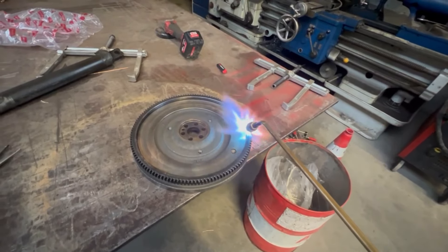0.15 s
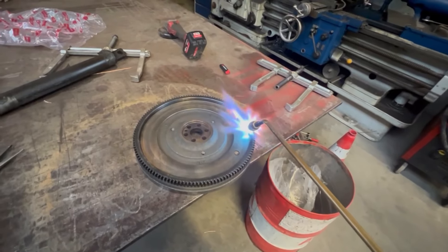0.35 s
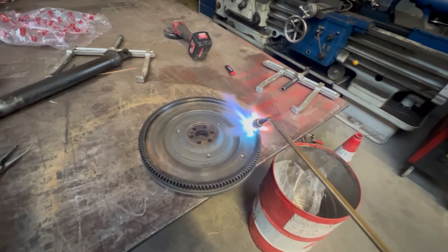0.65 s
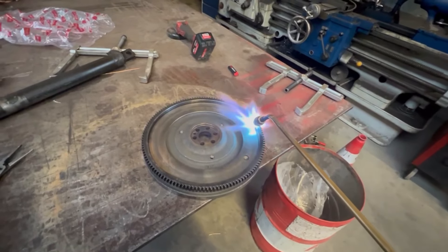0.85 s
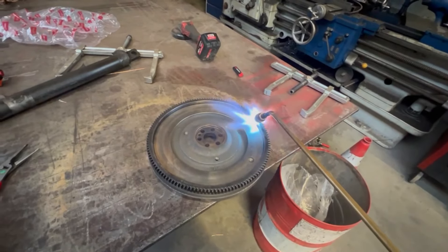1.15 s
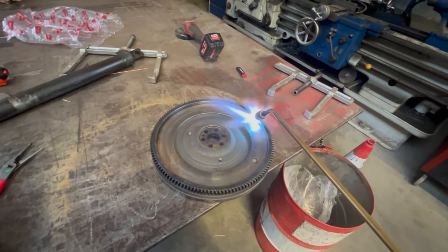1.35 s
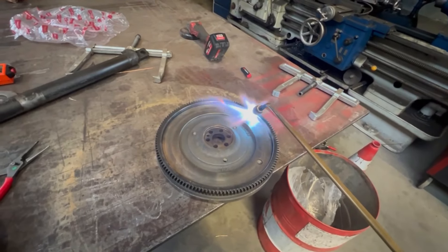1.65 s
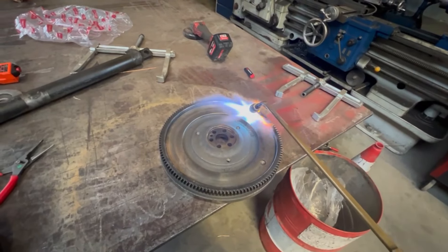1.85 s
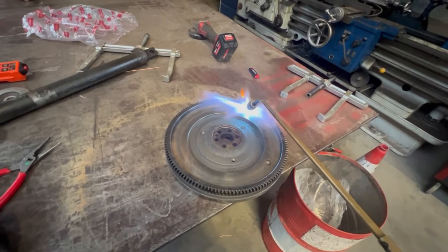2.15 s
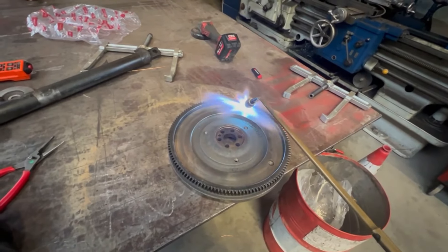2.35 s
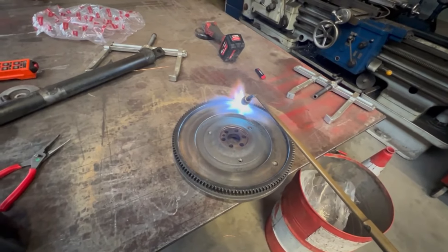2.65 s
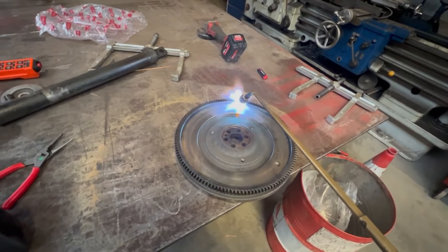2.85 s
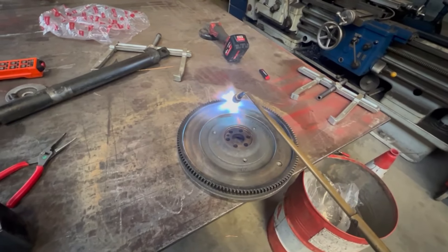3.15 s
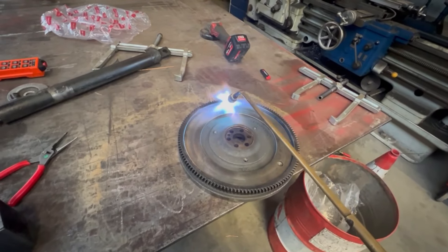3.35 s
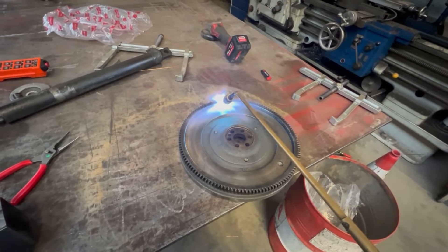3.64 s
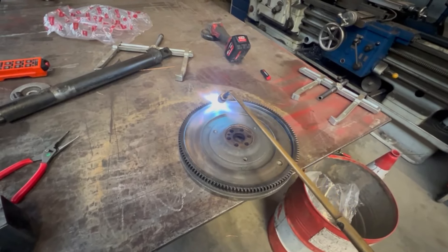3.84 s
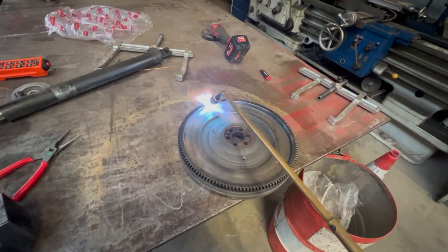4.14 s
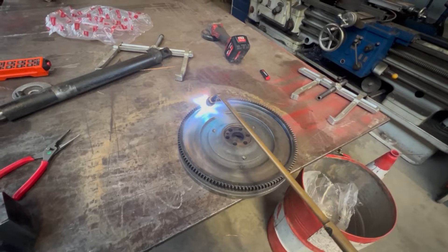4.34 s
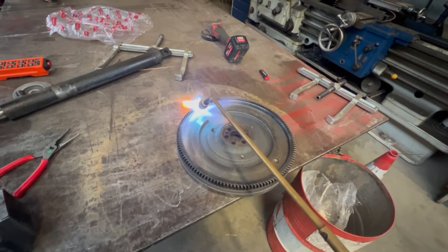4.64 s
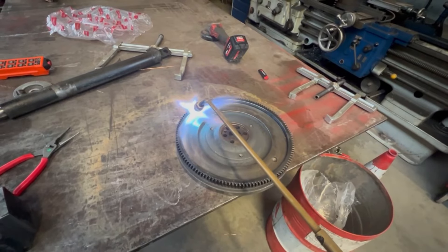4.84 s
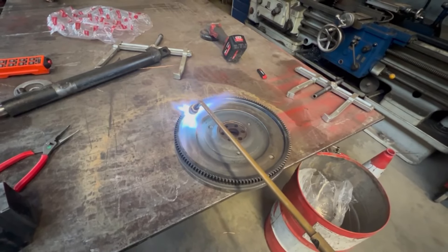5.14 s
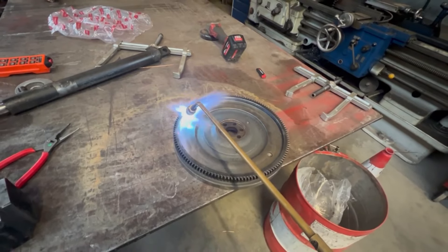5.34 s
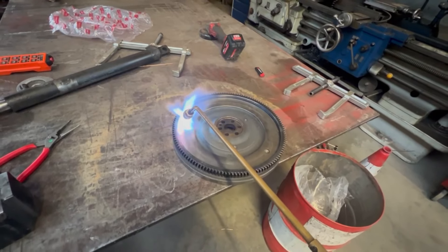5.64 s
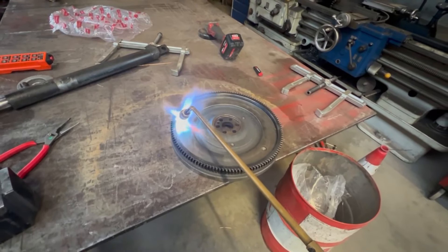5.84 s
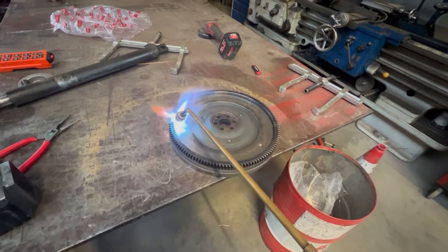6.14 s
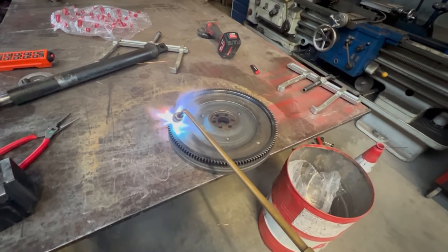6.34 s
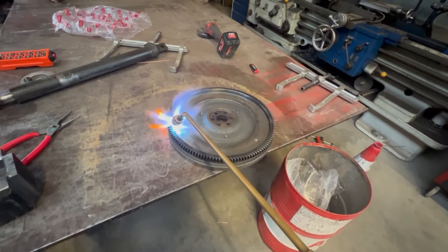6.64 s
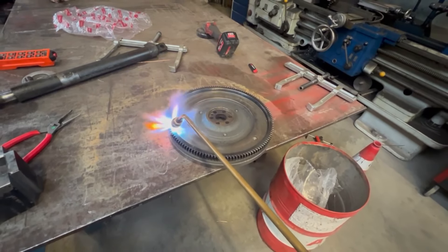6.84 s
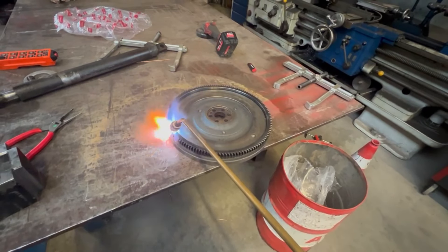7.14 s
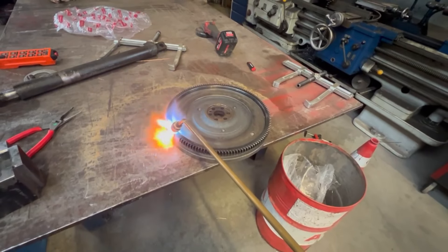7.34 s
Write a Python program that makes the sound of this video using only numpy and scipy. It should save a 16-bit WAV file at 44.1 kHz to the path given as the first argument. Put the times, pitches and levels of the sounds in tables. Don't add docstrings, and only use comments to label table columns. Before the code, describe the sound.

Already running at the start, a torch flame gives a soft deep rumble and a sharp airy jet. As it travels round a steel flywheel, the hiss shifts between smooth splashing and breathy, whistling roughness, with quick flares of very high fizz. It grows thinner around five seconds, then presses strongly again. Close wide stereo, slight workshop reverberation, no separate impacts.

```python
import sys
import numpy as np
from scipy import signal
from scipy.fft import rfft, irfft, next_fast_len
from scipy.io import wavfile
from scipy.ndimage import map_coordinates

SR = 44100
rng = np.random.default_rng(int(sys.argv[2]) if len(sys.argv) > 2 else 0)


def natural_amplitude(level_db):
    exponent = np.asarray(level_db, float) / 20
    return 10 ** exponent


def output_pcm(signal):
    pcm = np.clip(np.atleast_2d(signal).T, -1, 1) * 32767
    wavfile.write(sys.argv[1], SR, np.round(pcm).astype(np.int16))


N = 330309
SIZE = 512
HZ = np.fft.rfftfreq(SIZE, 1 / SR)

# start_s, upper_roar_gain_db
FLAME_FACING = [
    (0, 2.5),
    (.5, 4.5),
    (1.1, 0),
    (2.9, 2),
    (3.65, -4.5),
    (4, 0.5),
    (5.2, -6.5),
    (6.3, 0),
    (7.3, 2.5),
]
# pitch_hz, level_db (per Hz)
ROAR_COLOUR = [(20, -12.5), (100, 0), (260, -0.5), (480, -2.5), (850, -10), (1150, -9.5), (1600, -14),
               (2200, -19), (4000, -15.5), (9000, -20)]
# pitch_hz, share (0-1)
FACING_SHARE = [(650, 0), (1000, 0.63), (1700, 1), (3000, .6), (6000, 0.19)]


def roar(gains):
    facing_db = np.interp(slice_times(gains.shape[2]), *np.transpose(FLAME_FACING))
    beam = natural_amplitude(np.outer(along(FACING_SHARE, HZ), facing_db))
    rumble = turbulence(gains * beam, natural_amplitude(along(ROAR_COLOUR, HZ)), patchy_db=0.0, wide_hz=406, long_s=0.23)
    return natural_amplitude(-29.5 + 0.34 * wobble(2.925)) * rumble


def jet(gains):
    splash_db, teeth_db, nozzle_db, pan_db = levels()
    flap, puffs = wobble(14), wobble(200)
    pan = natural_amplitude(np.array([pan_db, -pan_db]) / 2)
    hiss = splash(gains, splash_db, puffs)
    hiss = hiss + pan * teeth(gains, teeth_db, flap, puffs)
    return hiss + nozzle(gains, nozzle_db, flap, puffs)


# pitch_hz, level_db (per Hz)
SPLASH_COLOUR = [(1500, -21.5), (2500, -8.5), (3200, -3), (4000, 1), (4600, -6.5), (5500, -2.5),
                 (8000, -36)]


def splash(gains, level_db, puffs):
    unrest_db = 0.24 * puffs + 0.16 * wobble(170)
    eddies = turbulence(gains, natural_amplitude(along(SPLASH_COLOUR, HZ)), patchy_db=2.0, wide_hz=593, long_s=0.31)
    return natural_amplitude(level_db + unrest_db) * eddies


# pitch_hz, width_hz, level_db
TOOTH_GAPS = [
    (5240, 790, -8),
    (6120, 670, -3),
    (6890, 830, -6),
    (7800, 1600, -10.5),
]


def teeth(gains, level_db, flap, puffs):
    power = 0
    for pitch_hz, width_hz, gap_db in TOOTH_GAPS:
        power = power + natural_amplitude(gap_db) ** 2 / (1 + (2 * (HZ - pitch_hz) / width_hz) ** 6)
    unrest_db = 0.84 * flap + 0.5 * puffs + 0.56 * wobble(200)
    eddies = turbulence(gains, np.sqrt(power), patchy_db=2.4, wide_hz=702.5, long_s=0.15)
    return natural_amplitude(level_db + unrest_db) * eddies


# pitch_hz, level_db (per Hz)
NOZZLE_COLOUR = [(6000, -30), (8500, -7), (10500, -4), (11700, 0), (12300, -1.5), (12900, -7), (13700, -10),
                 (14600, -6), (15600, -4), (17000, -4)]


def nozzle(gains, level_db, flap, puffs):
    unrest_db = 0.3 * flap + 0.76 * puffs + 1.0 * wobble(260)
    eddies = turbulence(gains, natural_amplitude(along(NOZZLE_COLOUR, HZ)), patchy_db=1.63, wide_hz=1299, long_s=0.07)
    return natural_amplitude(level_db + unrest_db) * eddies


# start_s, force_db (jet on the steel), aim_db (flat face over teeth)
HAND = [(0, -27.5, -8.5), (.3, -24, -9), (.65, -27, -9.5), (.77, -23, -6), (1.83, -24, -2.5),
        (2.07, -32.5, -6.5), (2.2, -23.5, -5.5), (2.45, -25.5, 1), (2.85, -28.5, 2.5), (3.36, -29.5, -6.5),
        (3.7, -31, -9), (5.1, -35.5, -18), (5.86, -35, -9.5), (6.2, -28.5, -6), (6.33, -19.5, -11),
        (6.85, -23.5, -8), (7.1, -29.5, -14), (7.49, -33, -16)]
# middle_s, swell_db, length_s
FLARES = [(.02, 4.5, 0.12), (.22, 3, 0.13), (.52, 4.5, 0.17), (.72, 3, 0.069), (1.0, 2.5, 0.22),
          (1.27, 5, 0.21), (1.54, 6, 0.034), (1.95, 2.5, 0.044), (2.1, 4.5, 0.087), (2.31, 5.5, 0.13),
          (2.42, 5.5, 0.12), (2.65, 2.5, 0.066), (2.8, 9, 0.23), (3.05, 5, 0.088), (3.2, 2, 0.13),
          (3.55, 2, 0.13), (3.85, 3, 0.11), (3.97, 4.5, 0.16), (4.13, 6, 0.25), (4.4, 6, 0.22),
          (4.65, 9, 0.15), (4.92, 8.5, 0.091), (5.2, 2, 0.057), (5.43, 9.5, 0.14), (5.68, 1, 0.064),
          (5.95, 1, 0.058), (6.35, 3.5, 0.16), (7.0, 3, 0.072), (7.18, 5.5, 0.12), (7.45, 6.5, 0.18)]
# middle_s, swell_db, length_s
CATCHES = [(.1, 0.5, .1), (.25, 0, .06), (.42, -2.5, 0.073), (.77, 4, .06), (.92, -10.5, 0.1),
           (1.27, -1, 0.18), (1.48, -2, .12), (1.68, 2, 0.19), (1.83, 5, 0.12), (2.15, 1, 0.04),
           (2.42, 6, 0.12), (3.0, 2.5, 0.065), (3.11, 6, 0.092), (3.5, 11, .2), (3.88, 1, 0.085),
           (4.05, 0, 0.065), (4.3, -2, 0.072), (5.28, 2.5, 0.17), (5.63, 5, 0.13), (5.78, 1, .06),
           (6.84, 0, 0.069), (7.49, 6.5, .08)]


def levels():
    force_db, aim_db = curves(HAND)
    flare_db, catch_db = swells(FLARES), swells(CATCHES)
    extra_force_db = force_db + 27.5
    splash_db = force_db + aim_db + 0.18 * flare_db + 0.19 * catch_db
    teeth_db = force_db + 0.18 * flare_db + catch_db
    nozzle_db = -23 + 0.74 * extra_force_db + flare_db
    pan_db = 3.5 + 0.4 * aim_db - 0.2 * extra_force_db + 1.5 * wobble(12)
    return splash_db, teeth_db, nozzle_db, pan_db


# pitch_hz, lead_half_turns
LEAD_RIGHT = [(0, 0), (690, -.45), (1150, -2.1), (1400, -2.6), (1800, -2.7), (2200, -3), (2700, -2.6),
              (3250, -3), (3750, -3.7), (4600, -3.95), (6300, -4.1), (7000, -5.6), (8400, -6.3)]
# pitch_hz, lead_half_turns
LEAD_FAR_LEFT = [(0, 0), (690, -.45), (1150, -2.1), (1900, -3.9), (2400, -5.1), (2700, -6), (3450, -6.3),
                 (3750, -6.9), (4200, -7.1), (4750, -8.8), (6000, -10.1), (6550, -10.4), (6900, -11.8),
                 (8400, -12.3)]
# pitch_hz, lead_half_turns
LEAD_NEAR_LEFT = [(0, 0), (690, -.45), (1150, -2), (1400, -1.5), (1800, -2.1), (2150, -3), (2670, -3),
                  (3100, -4), (4200, -4.5), (5400, -4.9), (5770, -6.1), (6550, -6), (7300, -7), (8400, -8.3)]
# pitch_hz, lead_half_turns
LEAD_TREBLE = [(8400, -.3), (9000, 0), (10050, .87), (10800, 1.13), (11900, 1.87), (12800, 2.2), (13850, 3),
               (15400, 3.95)]
# start_s, place (0 right of the hub, 1 far left, 2 near left in front)
TRAVEL = [
    (0, 0),
    (1.9, 0),
    (2.3, .35),
    (3.1, .5),
    (3.7, 1),
    (4.9, 1),
    (5.15, 1.55),
    (5.9, 1.6),
    (6.3, 2),
    (7.49, 2),
]
# pitch_hz, wander_radians
DRIFT = [(100, .03), (800, .3), (2000, .25), (3300, .3), (5000, .8), (6100, .4), (7300, .9), (8800, .3),
         (10400, .08), (13500, .3), (15600, .1)]
# pitch_hz, flicker_radians
SHIMMER = [(500, .05), (2500, .3), (4500, .6), (7500, .5), (10400, .2), (13500, .4), (15600, .25)]
# pitch_hz, left_over_right_db
TILT = [(100, 0), (450, 1.5), (750, -3), (1050, -10), (1700, 1), (2000, 2), (2700, -3), (3600, 3),
        (5100, 2), (7200, -3), (8800, 0)]


def paths():
    wander = along(DRIFT, HZ)[:, None] * field(700, 0.45)
    wander = wander + along(SHIMMER, HZ)[:, None] * field(450, 0.07)
    place = np.interp(slice_times(wander.shape[1]), *np.transpose(TRAVEL))
    blend = 0
    for spot, points in enumerate([LEAD_RIGHT, LEAD_FAR_LEFT, LEAD_NEAR_LEFT]):
        nearness = np.clip(1 - abs(place - spot), 0, 1)
        blend = blend + nearness * turn(points)
    lead = np.where(HZ[:, None] < LEAD_TREBLE[0][0], blend, turn(LEAD_TREBLE))
    tilt = natural_amplitude(along(TILT, HZ) / 2)[:, None]
    left = np.exp(1j * (np.angle(lead) + wander)) * tilt
    right = np.ones_like(wander) / tilt
    return np.array([left, right])


# pitch_hz, level_db
ECHO = [(60, -18), (300, -16), (900, -7), (2200, -7), (2750, -4.5), (3250, -7), (4900, -2.5), (7500, -5),
        (9000, -10), (10400, -26), (13000, -19), (16000, -22)]


def turbulence(gains, colour, patchy_db, wide_hz, long_s):
    direct, *echo = signal.stft(rng.standard_normal((3, N)), nperseg=SIZE)[2]
    count = direct.shape[1]
    large, small = field(wide_hz, long_s), field(wide_hz / 2, long_s / 3)
    patches = natural_amplitude(patchy_db * (large + 1.35 * small))[:, :count]
    ports = direct * gains[..., :count] + natural_amplitude(along(ECHO, HZ))[:, None] * np.array(echo)
    sound = signal.istft(ports * patches * colour[:, None], nperseg=SIZE)[1]
    return unit(sound[:, :N])


def unit(x):
    return x / np.sqrt(np.mean(np.abs(x) ** 2) + 1e-20)


def along(points, hz):
    f, v = np.transpose(points)
    return np.interp(np.log(hz + 1), np.log(f + 1), v)


def turn(points):
    return np.exp(1j * np.pi * np.interp(HZ, *np.transpose(points)))[:, None]


def slice_times(count):
    return np.arange(count) * SIZE / 2 / SR


def curves(rows):
    s, *columns = np.transpose(rows)
    return [np.interp(np.arange(N) / SR, s, column) for column in columns]


def swells(events):
    t = np.arange(0, N, 32) / SR
    bells = sum(db * np.exp(-(2 * (t - s) / length) ** 2) for s, db, length in events)
    return np.interp(np.arange(N) / SR, t, bells)


def wobble(rate):
    knots = rng.standard_normal(int(N * 400 / SR) + 4)
    return map_coordinates(knots, [np.arange(N) * rate / SR])


def field(wide_hz, long_s):
    times = slice_times(2 * N // SIZE + 3)
    f, t = np.meshgrid(HZ / wide_hz, times / long_s, indexing="ij")
    return unit(map_coordinates(rng.standard_normal((128, 384)), [f, t], order=3, mode="wrap"))


def scene():
    gains = paths()
    return roar(gains) + jet(gains)


def low_pass(x):
    return signal.sosfilt(signal.butter(12, 15860, fs=SR, output="sos"), x)


def record(dry):
    rounded = dry / (1 + np.abs(dry / 0.7) ** 4) ** (1 / 4)
    m = next_fast_len(N)
    hz = np.fft.rfftfreq(m, 1 / SR)
    bass_cut = 1 / (1 + (75 / (hz + 1)) ** 3)
    treble_cut = hz < 15830
    mix = irfft(rfft(rounded, m) * bass_cut * treble_cut, m)[:, :N]
    return low_pass(mix)


dry = scene()
out = record(dry)
output_pcm(out)
```